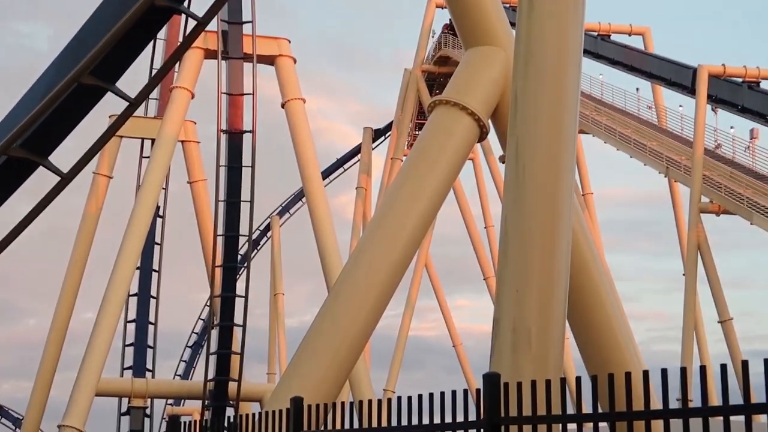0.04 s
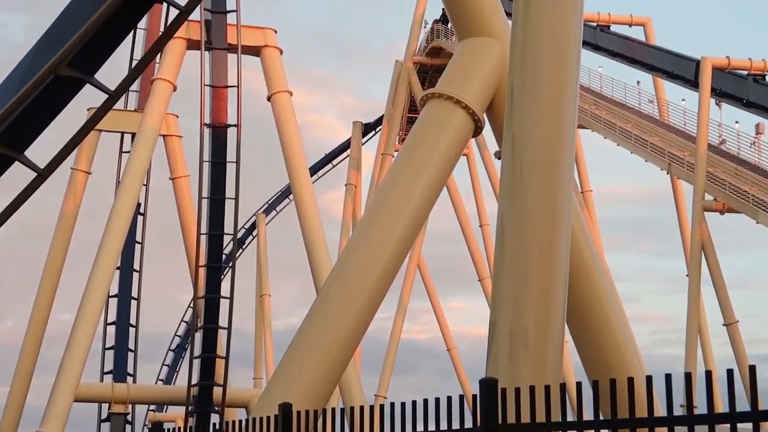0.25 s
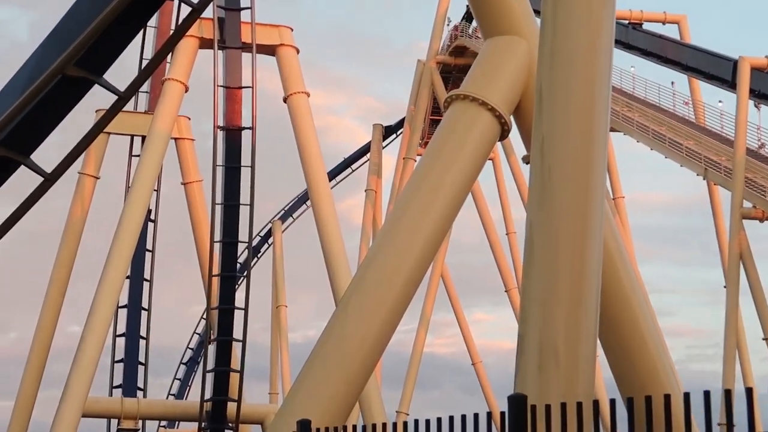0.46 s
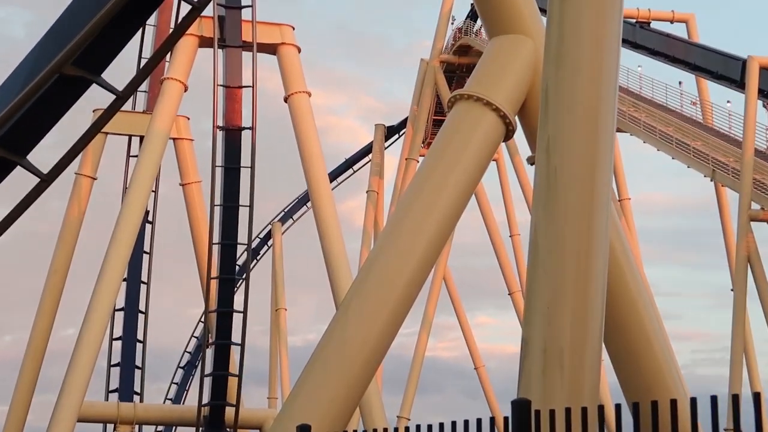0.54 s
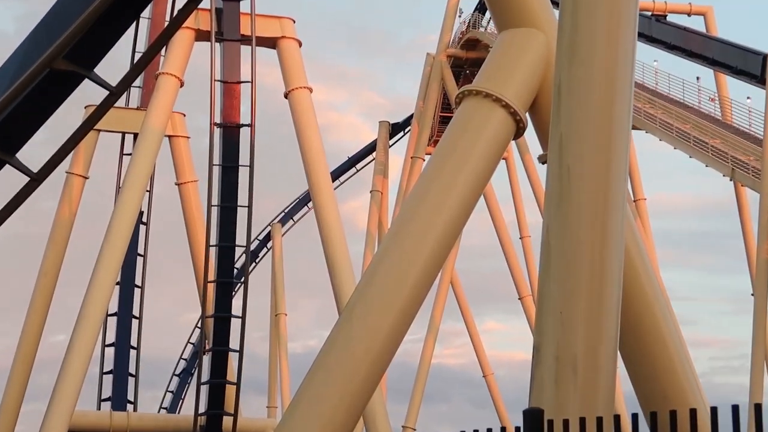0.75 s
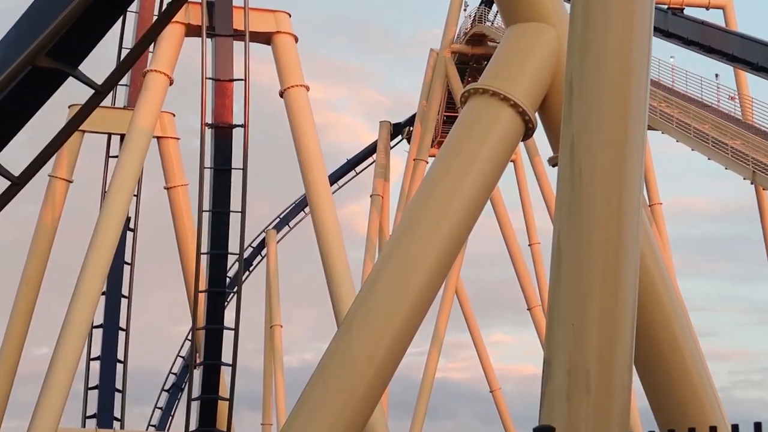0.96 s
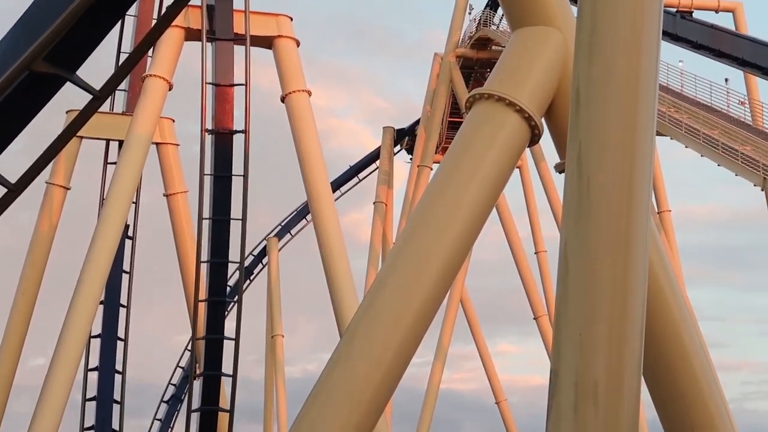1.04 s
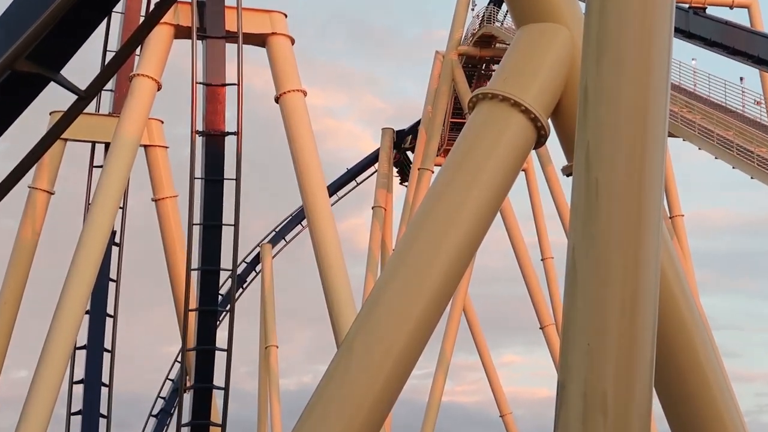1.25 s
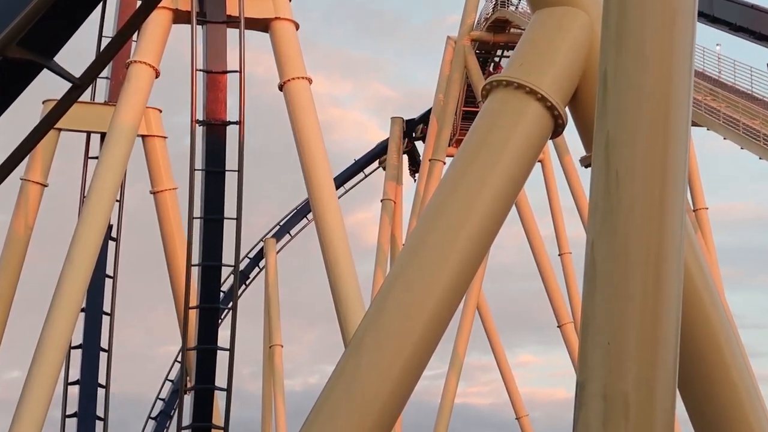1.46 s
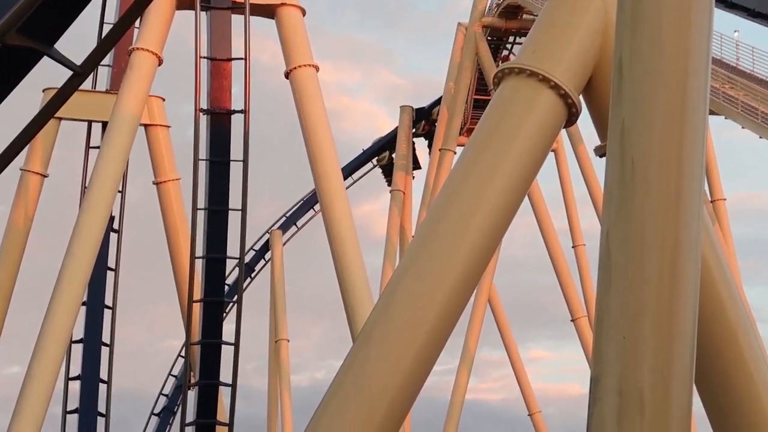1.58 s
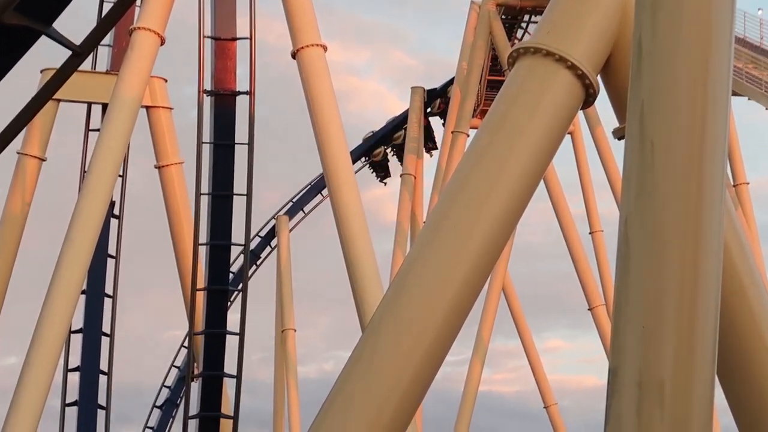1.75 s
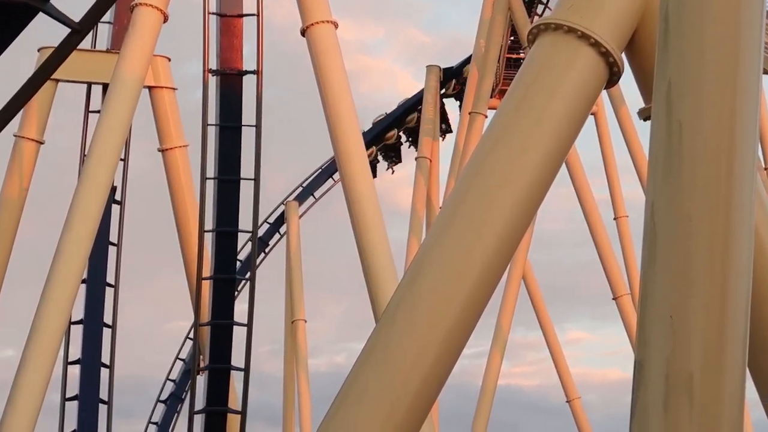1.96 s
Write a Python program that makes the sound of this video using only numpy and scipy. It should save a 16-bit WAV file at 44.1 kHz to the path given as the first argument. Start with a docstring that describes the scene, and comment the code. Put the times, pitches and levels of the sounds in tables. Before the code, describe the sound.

A steel roller coaster train rolls with a rough, mid-low rumble ringing through rails and supports. At 0.1 s a crunchy, multi-hit metal clack bursts close by, ringing briefly. The rumble dips, then swells while faint bright chain ticks run from 0.6 to 1.2 s. A low support groan bends at 1.1-1.3 s; a sharper clack hits at 1.3-1.4 s. Quieter rumble remains, with a very faint high squeal from 1.6 to 1.9 s.

```python
"""Steel coaster train and clacks

A steel coaster train rolls along its track: rough wheels shake rails and supports into a rumble of coloured noise.
A support groans and a wheel squeals thinly (gliding sines); a chain ticks, mostly about seven times a second.
Two crunchy clacks of several gritty noise blows burst out close by, with brief pitched rings around them.
The rumble's level table dips after each clack and creeps back. Two microphone ports, made as sum and difference.
"""
import sys
import numpy as np
from scipy import signal
from scipy.fft import rfft, irfft
from scipy.io import wavfile
from scipy.ndimage import uniform_filter1d

SR = 44100
rng = np.random.default_rng(int(sys.argv[2]) if len(sys.argv) > 2 else 0)


def master(y):
    """Save y as 16-bit WAV."""
    cut = np.clip(np.atleast_2d(y).T, -1, 1)
    pcm = np.round(cut * 32767)  # scale
    wavfile.write(sys.argv[1], SR, pcm.astype(np.int16))


N = 89082
T = np.arange(N) / SR
HZ = np.maximum(np.fft.rfftfreq(N, 1 / SR), 1)


def undb(db):
    """Amplitude factor of a level in dB."""
    return 10 ** (np.asarray(db) / 20)


def curve(table):
    """Gain per bin of (frequency [Hz], level [dB]) points, interpolated over log frequency."""
    hz, db = np.array(table).T
    return undb(np.interp(np.log(HZ), np.log(hz), db))


def resonances(modes):
    """Complex response per bin of ringing resonances standing on a flat base."""
    response = 1
    for hz, width_hz, db in modes:
        response = response + (undb(db) - 1) / (1 + 2j * (HZ - hz) / width_hz)
    return response


def walk(rate_hz):
    """Random levels held 1 / rate_hz and slewed twice; mean 0, spread 1."""
    hold = int(SR / rate_hz)
    steps = np.repeat(rng.standard_normal(N // hold + 1), hold)
    slewed = uniform_filter1d(uniform_filter1d(steps, hold), hold)[:N]
    return (slewed - slewed.mean()) / slewed.std()


def port_noise(sum_gain, side_gain, left=0., lead=0., diffuse=1., rough=1):
    """Spectra of port sum and difference; the difference mixes in-phase, quarter-cycle and independent noise."""
    common, scattered = rfft(rng.standard_normal((2, N)) * rough)
    norm = np.sqrt(left ** 2 + lead ** 2 + diffuse ** 2)
    difference = (left * common + 1j * lead * common + diffuse * scattered) / norm
    return np.array([sum_gain * common, side_gain * difference])


def unit(ports):
    """Scale both rows so the port sum has rms 1."""
    return ports / np.sqrt(np.mean(ports[0] ** 2))


def burst(start_s, attack_s, t60_s):
    """Envelope: exponential rise with time constant attack_s, fall of 60 dB per t60_s."""
    age_s = np.maximum(T - start_s, 0)
    return (1 - np.exp(-age_s / attack_s)) * undb(-60 * age_s / t60_s)


# range levels of the port sum (time [s], bass [dB], low body [dB], body [dB], wash [dB], hiss [dB])
ROLL_LEVELS = [(0.0, -23, -23.5, -21, -25, -37), (0.11, -24.5, -22.5, -16.5, -29.5, -35.5),
               (0.15, -39, -25.5, -29.5, -26, -33), (0.26, -31.5, -32, -26, -32.5, -41),
               (0.3, -36.5, -36, -27, -29.5, -38.5), (0.43, -36.5, -31, -25, -31.5, -45.5),
               (0.6, -33, -29, -23.5, -29.5, -42), (0.92, -37.5, -26.5, -22, -28.5, -40),
               (1.0, -31.5, -28.5, -21, -27, -39.5), (1.15, -36.5, -20, -20, -24.5, -38),
               (1.23, -32.5, -21, -20, -24.5, -34.5), (1.28, -30.5, -21.5, -17, -24, -35),
               (1.36, -36.5, -35, -21, -21, -35.5), (1.39, -53, -37, -28.5, -29, -43.5),
               (1.49, -49, -31.5, -30, -37, -49), (1.58, -42.5, -41.5, -31.5, -36, -50),
               (1.75, -45.5, -36, -29.5, -34, -48), (2.02, -45, -42, -27.5, -32, -47.5)]
# borders between those ranges [Hz]
ROLL_EDGES_HZ = [130, 280, 950, 3000]
# relative noise density, port sum (frequency [Hz], level [dB])
ROLL_COLOUR = [(15, -55), (25, -20), (65, -12), (110, -7), (141, -6), (197, -4), (429, -3), (475, -4),
               (700, -6.5), (1440, -15), (1680, -19), (5250, -34.5), (8360, -52.5), (12000, -111),
               (15600, -104), (22000, -120)]
# relative noise density, port difference (frequency [Hz], level [dB])
ROLL_SIDE = [(30, -23.5), (100, -30), (196, -35.5), (359, -3.5), (502, -3), (688, -2.5), (1400, -3),
             (5150, -8), (6480, -15), (8340, -15.5), (12400, -23), (15000, -68)]
# rail and support resonances (frequency [Hz], width [Hz], level above the colour [dB])
RAILS = [(190.7, 20, 4.5), (258.4, 39, 3), (349, 15.6, 4.5), (450, 25, 4.5), (709.4, 31, 6),
         (798, 20.7, 7.5), (896, 8.3, 6.5), (963, 7.7, 1), (1345, 8.3, 7), (1594, 3.3, 12.5),
         (2450, 340, 2.5), (5340, 150, 1), (8260, 80, 11)]
ROLL_SIDE_DB = -23.5  # offset of ROLL_SIDE
FLICKER_DB, FLICKER_HZ = .4, 9
WHEEL_ROUGH_DB, WHEEL_ROUGH_HZ = 1.4, 160


def rumble():
    """Wheel noise rings rails and supports; third-octave bands flicker, the three upper ranges are rough."""
    noise = resonances(RAILS) * port_noise(curve(ROLL_COLOUR), curve(ROLL_SIDE) * undb(ROLL_SIDE_DB))
    ranges = np.zeros((5, 2, N))
    for hz in 25 * 2 ** (np.arange(29) / 3):
        band = np.cos(np.pi / 2 * np.clip(3 * np.log2(HZ / hz), -1, 1)) ** 2
        flicker = undb(FLICKER_DB * walk(FLICKER_HZ))
        ranges[np.searchsorted(ROLL_EDGES_HZ, hz)] += flicker * irfft(noise * band, N)
    for part in ranges[2:]:
        part *= undb(WHEEL_ROUGH_DB * walk(WHEEL_ROUGH_HZ))
    time_s, *levels_db = np.array(ROLL_LEVELS).T
    return sum(unit(part) * undb(np.interp(T, time_s, db)) for part, db in zip(ranges, levels_db))


TONE_FADE_S, PITCH_WAVER = .02, .0025  # PITCH_WAVER: fraction of pitch


def gliding_tone(table, side_db, waver_db):
    """A sine wavering in pitch and level glides along its table and fades at both ends."""
    time_s, hz, db = np.array(table).T
    fade = np.clip(np.minimum(T - time_s[0], time_s[-1] - T) / TONE_FADE_S, 0, 1)
    pitch_hz = np.interp(T, time_s, hz) * (1 + PITCH_WAVER * walk(60))
    phase = 2 * np.pi * (np.cumsum(pitch_hz) / SR + rng.random())
    level_db = np.interp(T, time_s, db) + waver_db * walk(41.2)
    size = np.sqrt(2) * fade * undb(level_db)  # table levels are rms
    return size * np.array([np.sin(phase), undb(side_db) * np.cos(phase)])


# low groan of a support (time [s], pitch [Hz], level [dB])
GROAN = [(1.08, 208, -32), (1.122, 214, -20.5), (1.15, 241, -19), (1.183, 235, -24), (1.198, 226, -22),
         (1.22, 200, -30), (1.255, 188, -25), (1.28, 175, -30)]


def groan():
    """A support groans: one low gliding pitch, nearly equal at both ports."""
    return gliding_tone(GROAN, side_db=-35, waver_db=1.)


# thin squeal of a wheel (time [s], pitch [Hz], level [dB])
SQUEAL = [(1.57, 4170, -62), (1.61, 4175, -56), (1.64, 4155, -59), (1.685, 4165, -50), (1.72, 4160, -54),
          (1.75, 4155, -50), (1.81, 4165, -59), (1.855, 4162, -53), (1.9, 4175, -62)]


def squeal():
    """A wheel squeals: one thin high pitch of unsteady level, strong in the port difference."""
    return gliding_tone(SQUEAL, side_db=-2., waver_db=3.5)


# chain ticks, level before the attack rounds it (time [s], level [dB])
TICKS = [(.578, -44), (.625, -43), (.765, -43), (.905, -39), (1.047, -39), (1.188, -36), (1.745, -49)]
# relative gain, port sum (frequency [Hz], level [dB])
TICK_COLOUR = [(1000, -30), (2500, -10), (5300, 0), (7000, -14), (9000, -35), (14000, -70)]
# relative gain, port difference (frequency [Hz], level [dB])
TICK_SIDE = [(1000, -40), (2500, -14), (5300, 5), (7000, -5), (8300, -3), (10000, -1), (12000, -14),
             (14000, -45)]
TICK_ATTACK_S, TICK_T60_S = 0.0038, 0.12


def ticks():
    """The chain ticks: short bright noise bursts, independent in port sum and difference."""
    hiss = unit(irfft(port_noise(curve(TICK_COLOUR), curve(TICK_SIDE)), N))
    return hiss * sum(undb(db) * burst(t, TICK_ATTACK_S, TICK_T60_S) for t, db in TICKS)


# steel rings, level before the attack rounds it (time [s], pitch [Hz], level [dB], attack [s], t60 [s])
RINGS = [(.005, 235, -19, .008, .18), (.048, 712, -15, .012, .16), (.106, 385, -10, .012, .16),
         (.128, 1300, -22, .006, .25), (.148, 900, -23, .01, .35), (.205, 900, -23, .008, .3),
         (1.258, 535, -15, .01, .16), (1.314, 1300, -16, .002, .12), (1.342, 1410, -20, .004, .15),
         (1.366, 2050, -14, .002, .05), (1.386, 1940, -23, .003, .1)]
RING_WAVER_DB, RING_SIDE_DB = 1.5, -20


def rings():
    """Steel rings around the clacks: each a steady pitch of wavering level that swells and dies."""
    out = 0
    for t, hz, db, attack_s, t60_s in RINGS:
        phase = 2 * np.pi * (hz * T + rng.random())
        size = undb(db + RING_WAVER_DB * walk(48)) * burst(t, attack_s, t60_s)
        out = out + size * np.array([np.sin(phase), undb(RING_SIDE_DB) * np.cos(phase)])
    return out


# blows of both clacks, levels before attack and modes
# (time [s], level [dB], attack [s], t60 [s], tilt [dB/octave], port difference offset [dB], favoured pitch [Hz])
BLOWS = [(.105, -17, 0.0008, 0.14, -5, -1, 1090), (.112, -27.5, 0.0027, 0.13, 1, 8, 4630),
         (.12, -20.5, 0.002, 0.16, -2.5, 0, 2500), (.133, -17.5, 0.0023, 0.26, -7, 6, 2500),
         (.146, -23, 0.0026, 0.22, -0.5, 3, 4300), (.158, -19, 0.0015, 0.14, -1, 6, 5450),
         (.174, -21, 0.0016, 0.17, -1.5, 4.5, 5330), (.203, -23.5, 0.012, 0.27, 1.5, -0.5, 2450),
         (1.315, -11.5, 0.0054, 0.058, 7, -5, 1380), (1.325, -19, 0.0029, 0.095, 1, 3, 2100),
         (1.341, -14, 0.0016, 0.074, -6, -8, 2340), (1.363, -10.5, 0.0036, 0.064, 4.5, -1.5, 2050),
         (1.379, -19, 0.0022, 0.1, 7, -1, 2250), (1.405, -31, 0.0018, 0.34, 5.5, -9, 1900)]
# relative gain, port sum (frequency [Hz], level [dB])
BLOW_COLOUR = [(60, -69), (200, -4.5), (500, 6.5), (1200, -1.5), (1800, 0.5), (2500, 7), (3300, -5.5),
               (5400, -11), (7800, -15.5), (10000, -21.5), (13500, -35.5), (15500, -62)]
# relative gain, port difference (frequency [Hz], level [dB])
BLOW_SIDE = [(59, -59), (100, -27), (668, -8), (898, -9.5), (1520, -3), (2520, -1), (3250, -5), (4660, -6),
             (6660, -6.5), (7730, -1), (13700, -11), (15500, -44)]
# modes rung by every blow (frequency [Hz], width [Hz], level above the colour [dB])
BLOW_MODES = [(385, 20, 8), (900, 30, 6), (1320, 60, 8), (1930, 80, 8), (2140, 70, 6), (2410, 50, 4),
              (2480, 45, 5), (2600, 50, 3), (2910, 35, 8), (3580, 45, 9), (3820, 50, 9), (4290, 90, 7),
              (5000, 90, 6), (5280, 45, 9), (5560, 120, 8), (7800, 690, 5.5)]
GRIT_DB, GRIT_HZ = 2.2, 900
BLOW_LEFT, BLOW_LEAD, BLOW_DIFFUSE = .55, .9, .4  # difference weights: louder left, earlier left, scattered
FAVOUR_DB, FAVOUR_OCTAVES = 7, .3


def clacks():
    """Each blow is a gritty noise burst with its own tilt and favoured pitch; all ring the same modes."""
    roughness = undb(GRIT_DB * walk(GRIT_HZ))
    grit = port_noise(curve(BLOW_COLOUR), curve(BLOW_SIDE), BLOW_LEFT, BLOW_LEAD, BLOW_DIFFUSE, roughness)
    octaves = np.log2(np.maximum(HZ, 300) / 2000)  # tilt pivots at 2 kHz, flat below 300 Hz
    blows = 0
    for k, (t, db, attack_s, t60_s, tilt_db, side_db, hz) in enumerate(BLOWS):
        favour_db = FAVOUR_DB * np.exp(-(np.log2(HZ / hz) / FAVOUR_OCTAVES) ** 2)
        coloured = unit(irfft(grit * undb(tilt_db * octaves + favour_db), N))
        own = np.roll(coloured, k * N // len(BLOWS), axis=1)  # a different stretch of noise per blow
        blows = blows + undb([[db], [db + side_db]]) * burst(t, attack_s, t60_s) * own
    return irfft(rfft(blows) * resonances(BLOW_MODES), N)


def scene():
    """Sum the sources, then turn port sum and difference into left and right."""
    mid, side = rumble() + groan() + squeal() + ticks() + rings() + clacks()
    return np.array([mid + side, mid - side])


BOTTOM_HZ, TOP_HZ = 34.6, 15700


def record(dry):
    """The deepest bass is cut, the loudest peaks are rounded, the top is cut."""
    low_cut = signal.butter(2, BOTTOM_HZ, "high", fs=SR, output="sos")
    top_cut = signal.ellip(10, .2, 80, TOP_HZ, fs=SR, output="sos")
    wet = signal.sosfilt(low_cut, dry)
    rounded = wet / (1 + wet ** 4) ** .25
    return signal.sosfilt(top_cut, rounded)


dry = scene()
out = record(dry)
master(out)
```